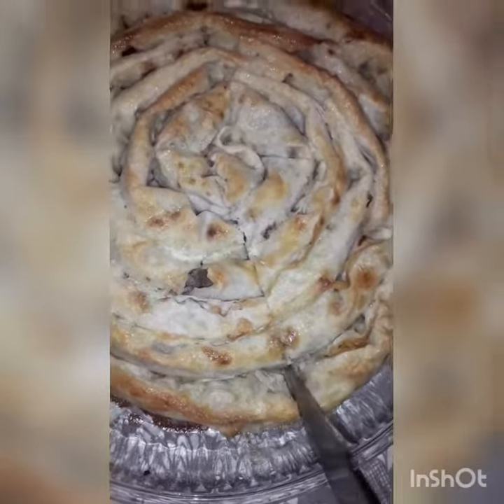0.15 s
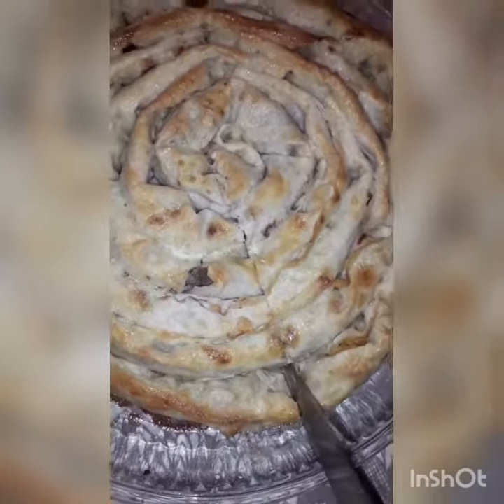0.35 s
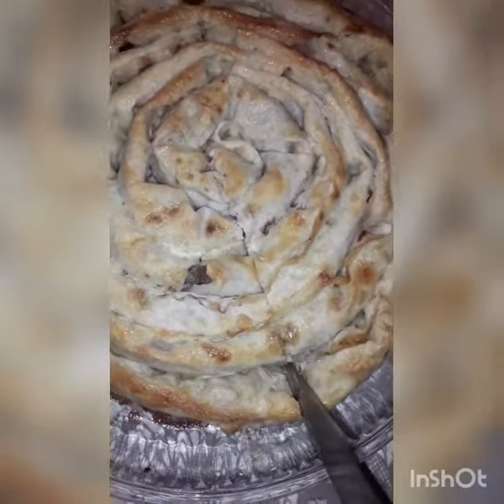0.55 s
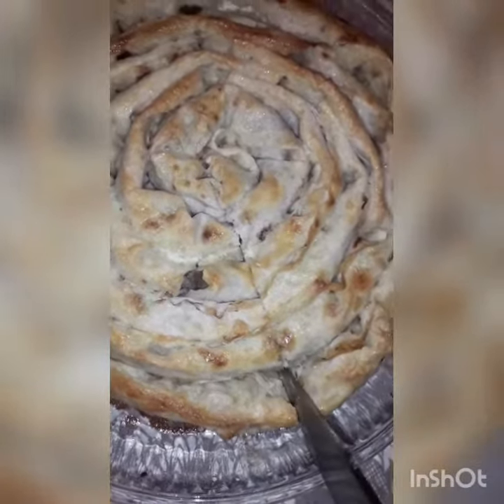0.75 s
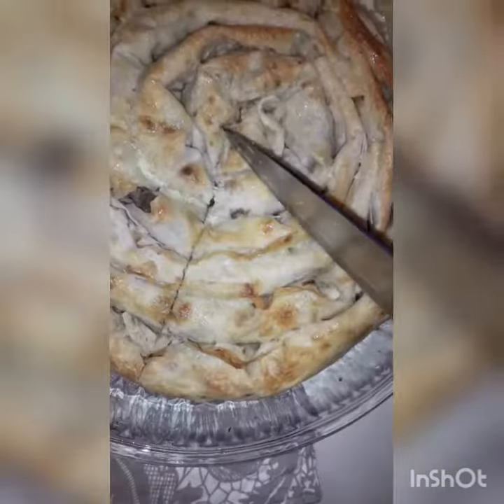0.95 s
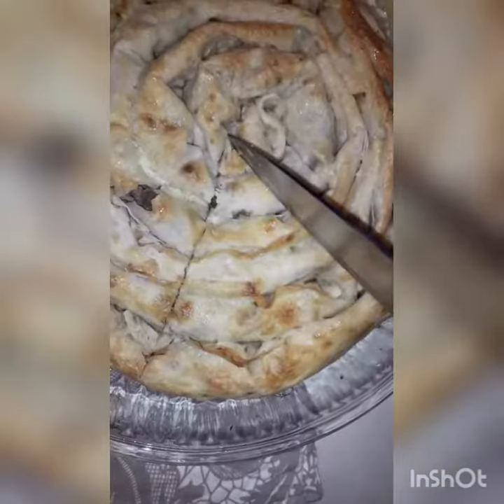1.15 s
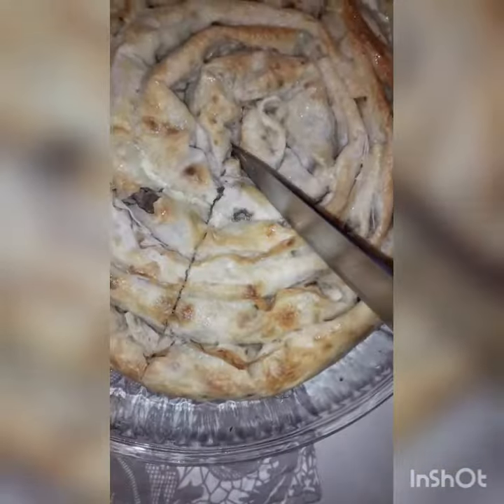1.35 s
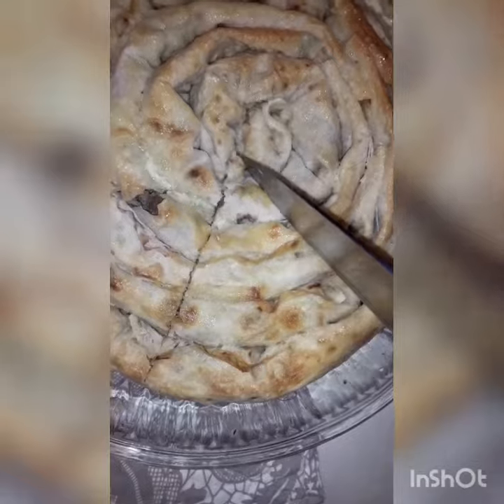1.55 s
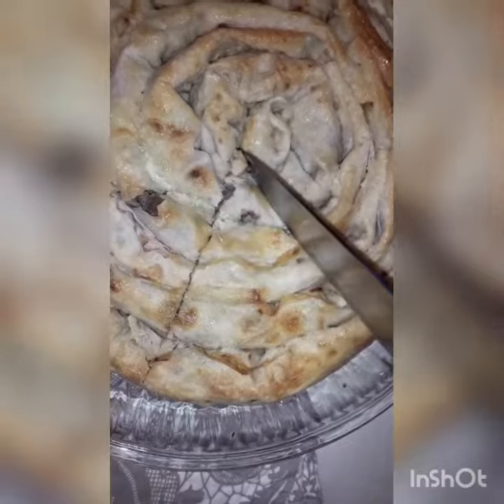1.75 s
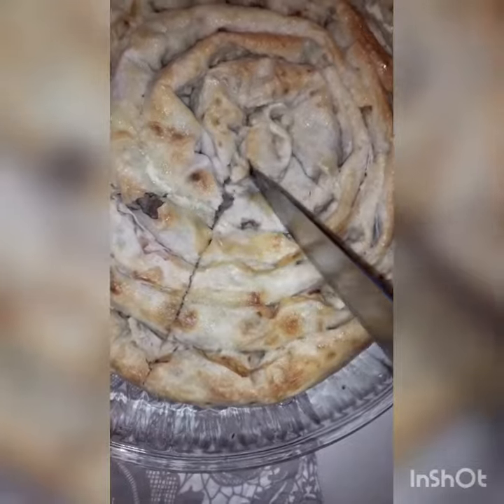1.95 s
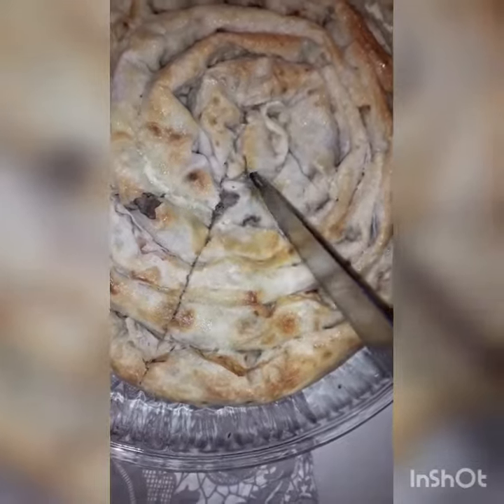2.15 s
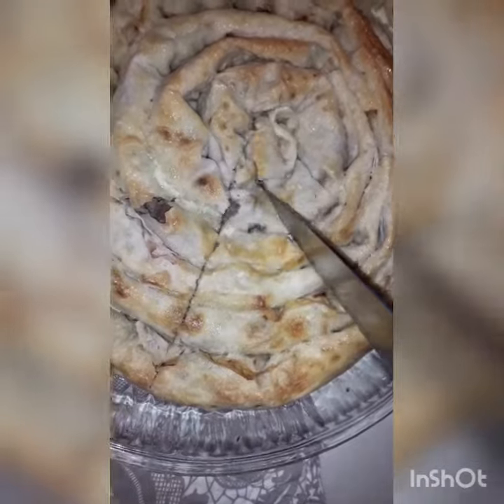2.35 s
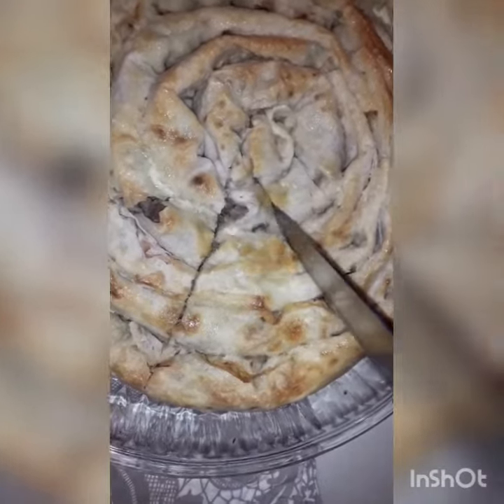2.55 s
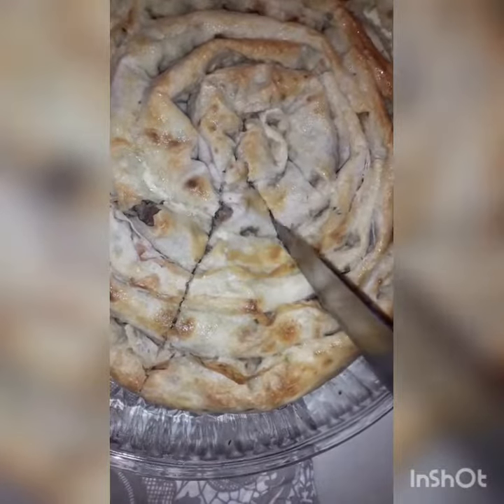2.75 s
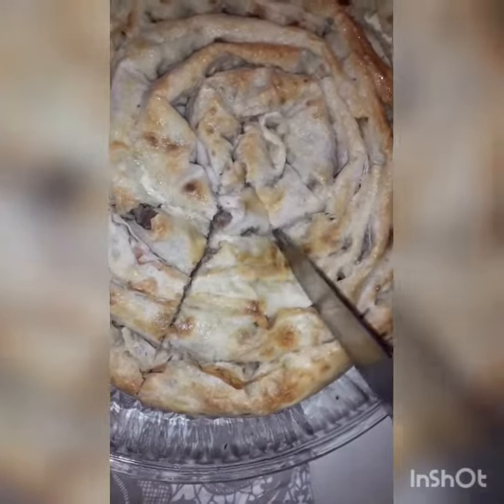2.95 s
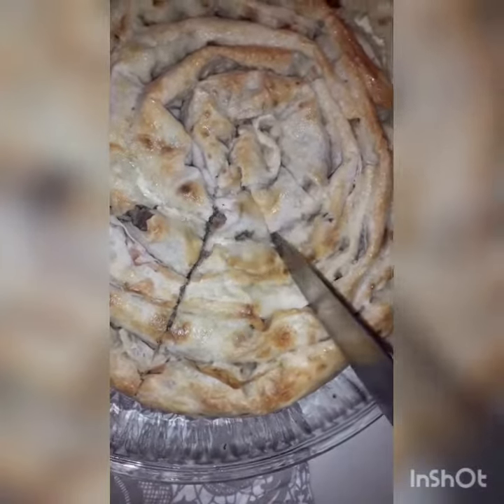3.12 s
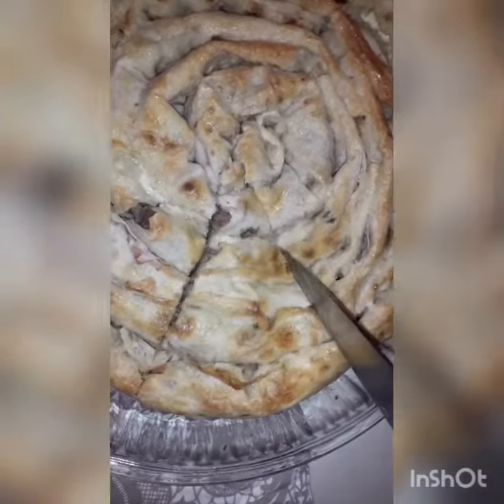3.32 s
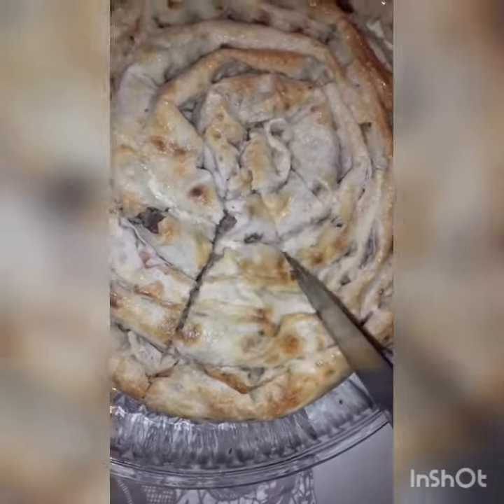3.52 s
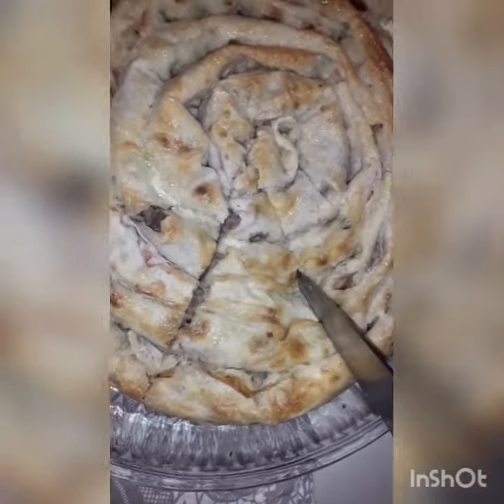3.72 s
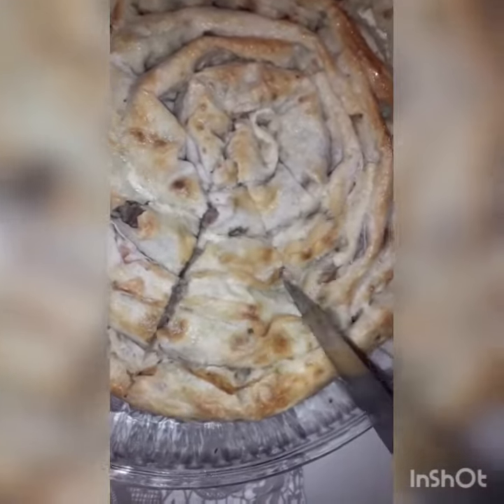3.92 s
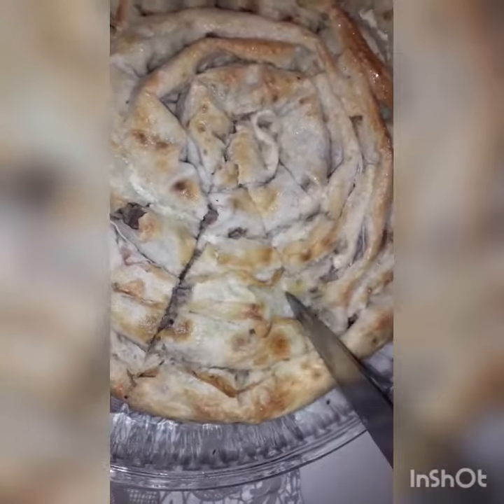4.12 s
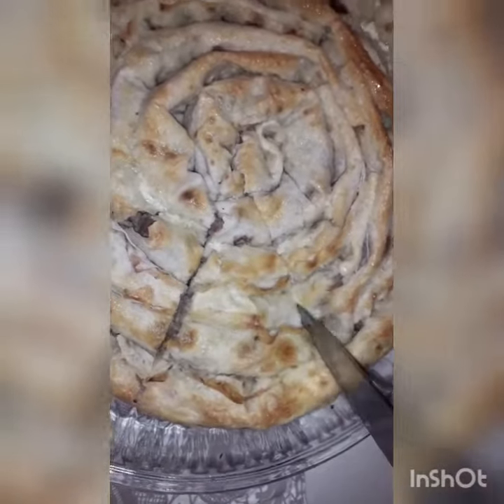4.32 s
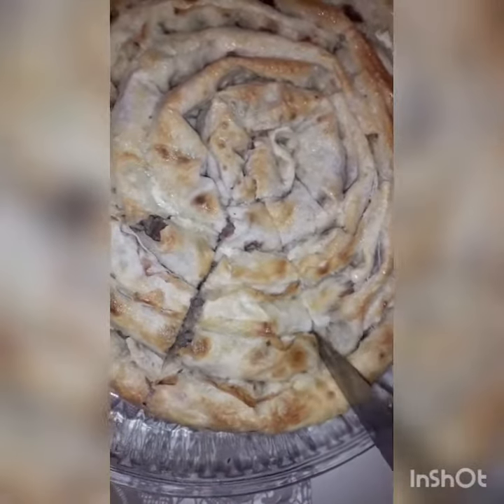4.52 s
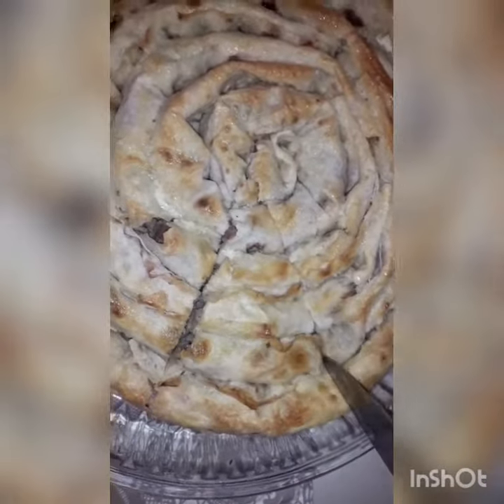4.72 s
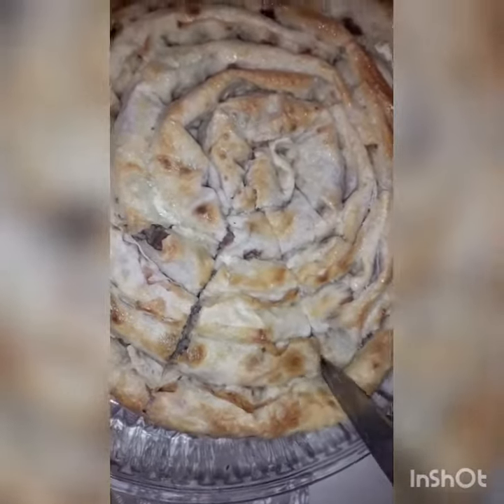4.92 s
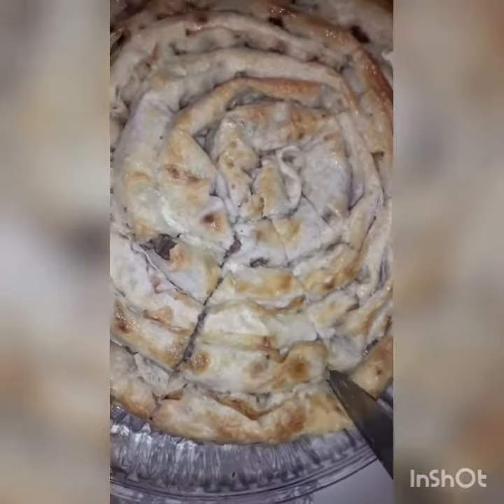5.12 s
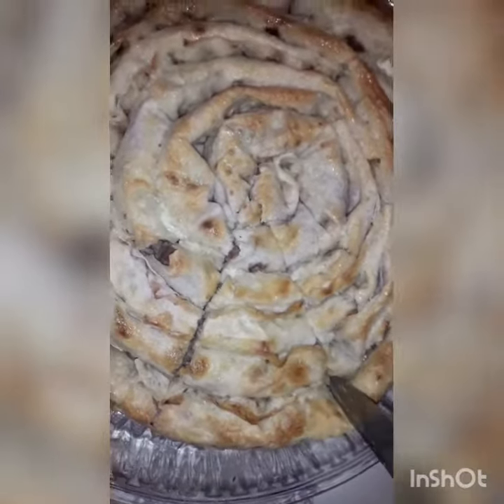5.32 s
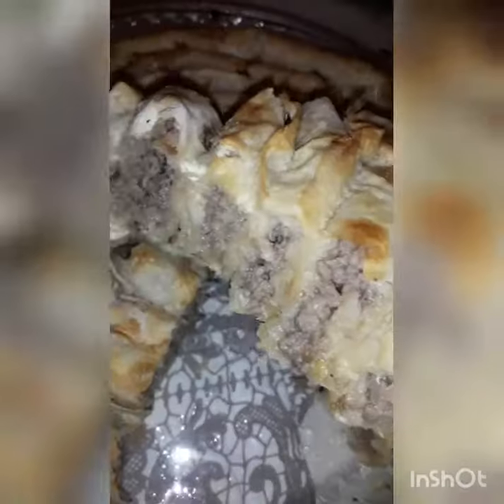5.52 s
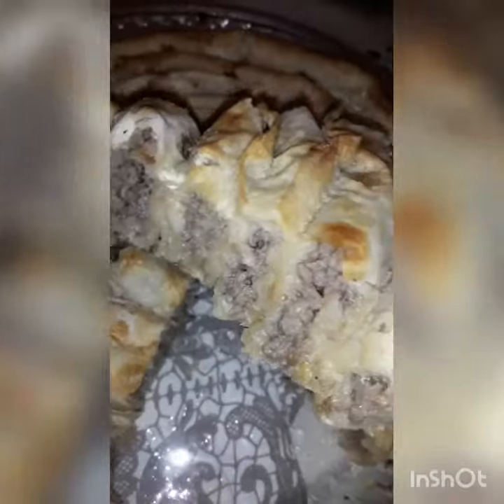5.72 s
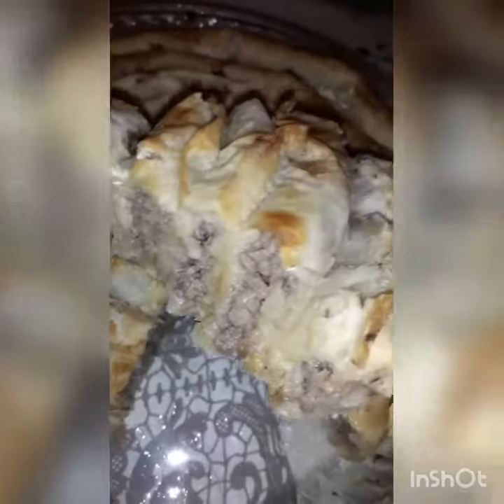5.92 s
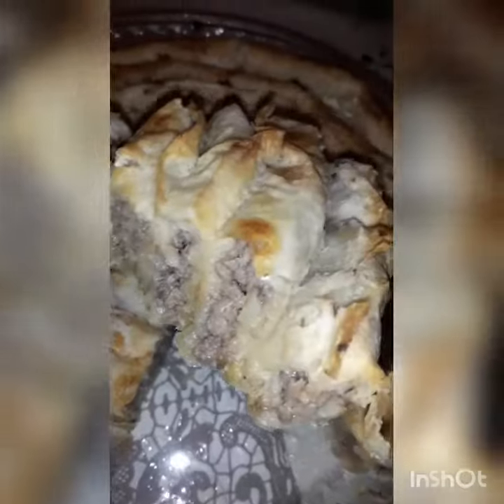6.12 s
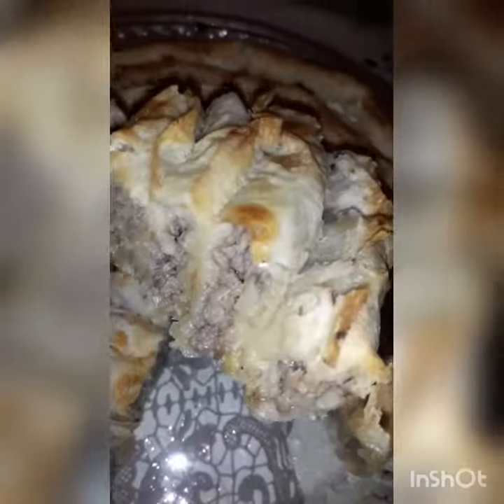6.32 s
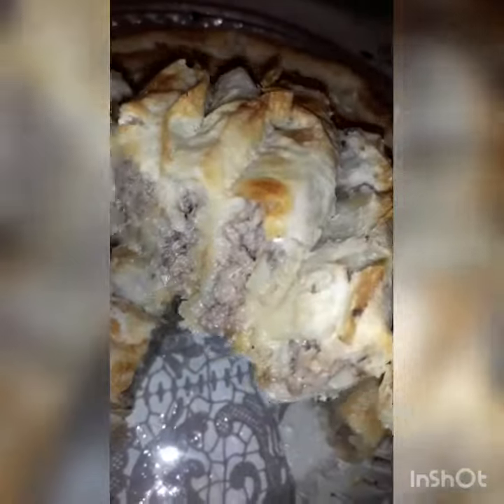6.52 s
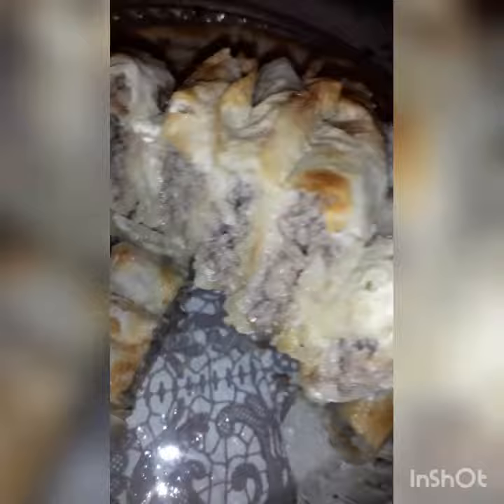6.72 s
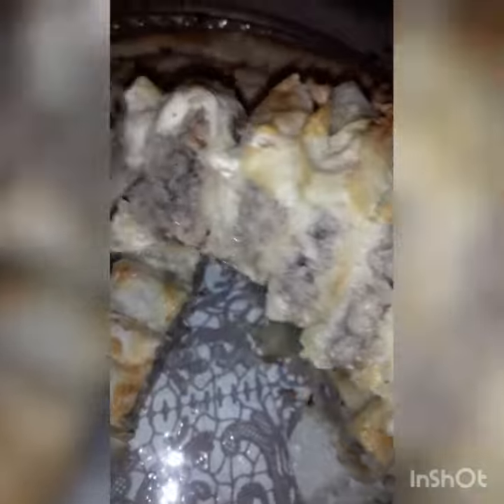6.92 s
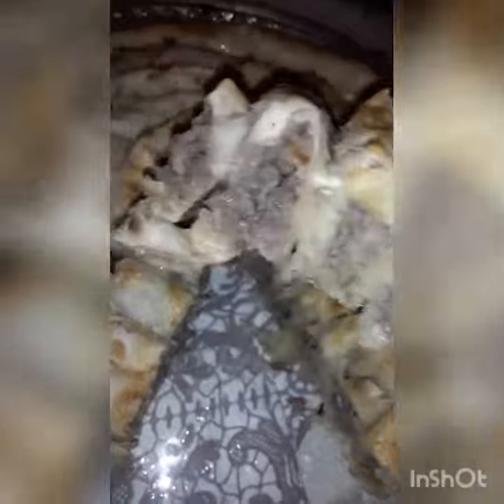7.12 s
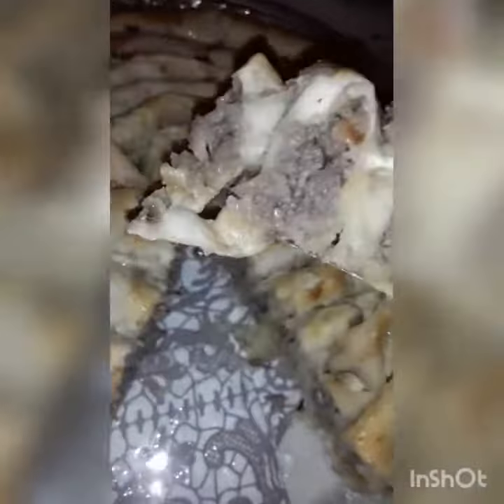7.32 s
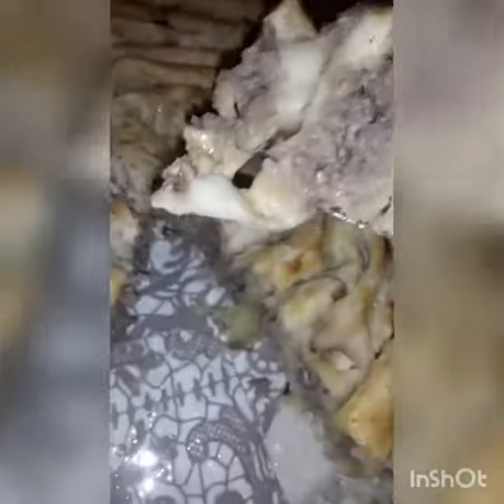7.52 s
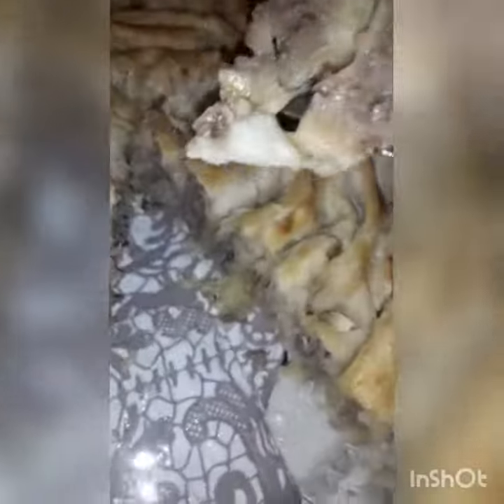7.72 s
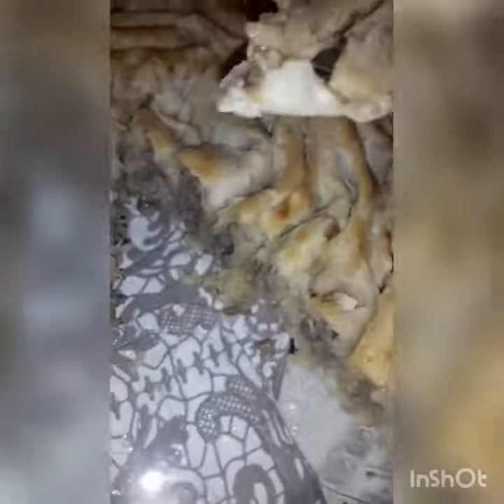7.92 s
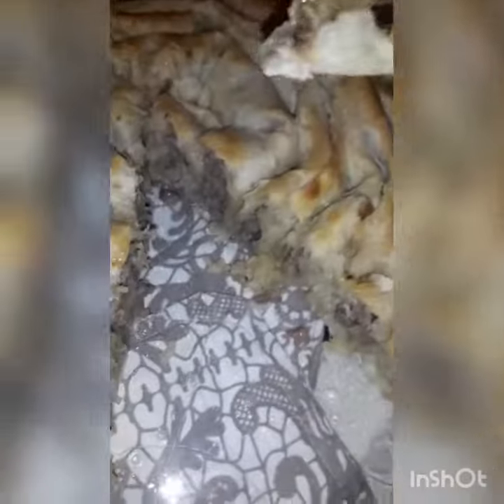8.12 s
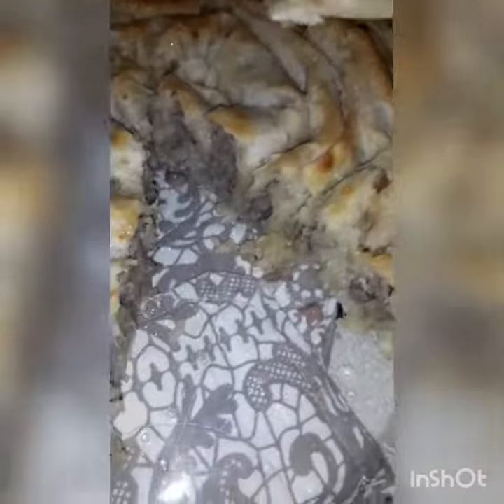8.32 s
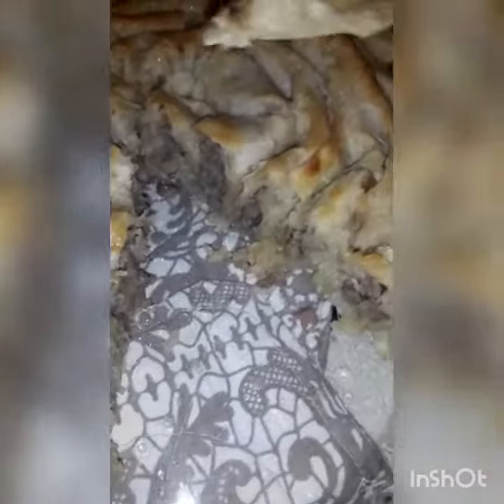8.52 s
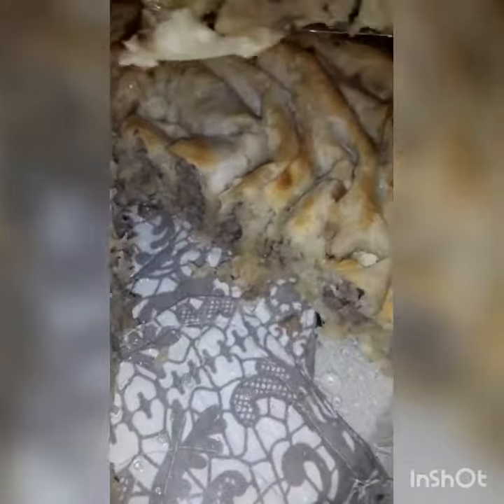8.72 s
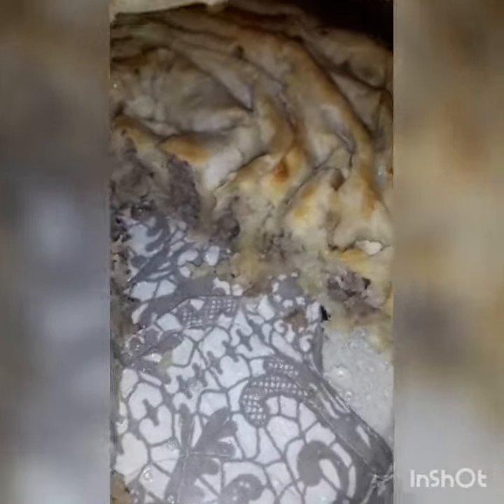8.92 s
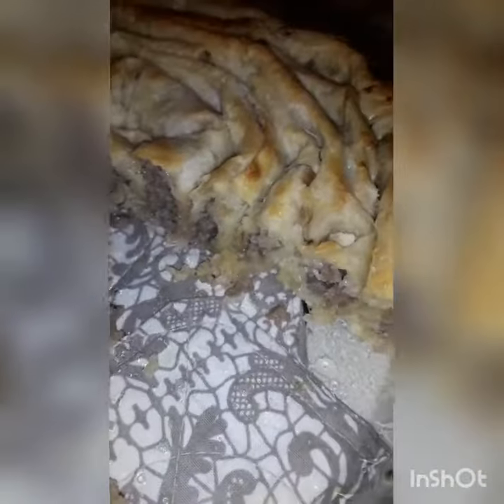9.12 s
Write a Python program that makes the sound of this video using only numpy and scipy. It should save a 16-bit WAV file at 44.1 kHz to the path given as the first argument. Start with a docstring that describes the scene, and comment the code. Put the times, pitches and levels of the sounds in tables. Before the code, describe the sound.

Crisp pastry crunches and snaps under a sawing knife, then a quiet kitchen hums on with dull thuds and a brief rub.

```python
"""A quiet kitchen: hiss, appliance tones and a knife sawing crisp pastry on a tray, close by.
Each stroke crushes flakes and snaps crust; the blade knocks the dish and taps the tray's rim.
At 5.4 s the sawing ends and the sound drops out for 30 ms. The kitchen hums on,
with dull thuds on the table, a few handling clicks and a short rub over cloth near the end."""
import sys
import numpy as np
from scipy import signal
from scipy.fft import rfft, irfft, next_fast_len
from scipy.io import wavfile
from scipy.ndimage import uniform_filter1d

SR = 44100
rng = np.random.default_rng(int(sys.argv[2]) if len(sys.argv) > 2 else 0)


def dump_mix(stems):
    """Bounce the given channels to the path in sys.argv[1] as a 16-bit WAV at rate SR."""
    frames = np.atleast_2d(stems).T  # one column per channel
    limited = np.clip(frames, -1, 1)  # hard clip at full scale
    pcm = np.round(limited * 32767).astype(np.int16)
    wavfile.write(sys.argv[1], SR, pcm)


N = 403937

HISS_SPECTRUM = [(150, -29), (250, -6), (601, -8.5), (853, -2), (1320, -10.5), (1780, -6), (2360, -7),
                 (2570, -10.5), (3470, -5), (4060, -7.5), (4510, -11), (6870, -10.5), (8630, -34.5),
                 (15100, -17), (16500, -22)]  # room hiss: f/Hz, level/dB
HISS_LEVEL = [(0, -66), (5.45, -66.5), (5.47, -59.5), (9.2, -58)]  # room hiss: t/s, level/dB
WHINE_TONES = [(877, 30, -77), (2290, 14, -76), (3435, 14, -70), (4580, 14, -79)]  # thin appliance tones: f/Hz, width/Hz, level/dB
WHINE_GAIN = [(0, -3), (5.45, -3), (7.45, 0), (7.55, 5), (8.2, 4), (8.3, -2), (9.2, -2)]  # their swell: t/s, gain/dB
HUM_TONES = [(54, 9, -65), (91, 9, -67), (119, 10, -70)]  # low appliance tones: f/Hz, width/Hz, level/dB
HUM_GAIN = [(0, -6.5), (5.3, -9.5), (5.6, 1.5), (6.5, 3), (7, -1.5), (8.5, -2), (8.9, 3), (9.2, 4.5)]  # their swell: t/s, gain/dB
STIR_SPECTRUM = [(40, -45.5), (70, -11), (100, 0.5), (145, -0.5), (250, -2.5), (300, -8.5), (400, -46.5)]  # low stir of hand and room: f/Hz, level/dB
STIR_LEVEL = [(0, -72), (5.43, -73), (5.5, -69), (6.5, -68.5), (6.65, -60), (6.8, -68), (7.45, -65),
              (8.1, -70), (8.27, -48), (8.4, -53), (8.46, -43), (8.58, -63.5), (8.7, -53.5), (8.9, -67),
              (9.2, -68.5)]  # same stir: t/s, level/dB

# crunch from saw strokes, plus noisy tails after rim taps: t/s at peak, hold/s, level/dB,
# attack/(dB/s), release/(dB/s), low/dB re mid, top/dB re mid
CRUNCH_SWELLS = [(.035, .03, -53.5, 300, 301.5, -11.5, -11), (.10, 0.0145, -46.5, 500, 124, -0.5, -17),
                 (.262, 0.017, -48.5, 398.5, 72, -9, -18.5), (.595, 0.0063, -65, 195.5, 150, -12, -12.5),
                 (.916, 0.01, -49.5, 68, 100, -8.5, -10), (1.016, 0.18, -52.5, 198, 60, -10.5, -16.5),
                 (1.27, .11, -37, 252, 289, -9.5, -12.5), (1.503, 0.035, -32, 500, 199, -14.5, -14),
                 (1.659, .06, -29.5, 320, 240, -4, -12), (1.887, 0.092, -29, 650, 900, -13, -12.5),
                 (2.043, 0.079, -31, 999.5, 150, -2.5, -9), (2.371, 0.0052, -41, 92, 226, -10.5, -9.5),
                 (2.535, 0.01, -29, 503, 400.5, -17.5, -5), (2.763, 0.0033, -30, 594, 356.5, -18, -12.5),
                 (2.961, 0.0033, -35.5, 200, 269, -9.5, -14.5),
                 (3.136, 0.064, -40.5, 418.5, 370, -12.5, -13.5), (3.363, 0.041, -35, 275, 650, -6, -10.5),
                 (3.53, 0.063, -45, 170, 440, -15, -12.5), (3.681, .06, -41.5, 420, 229, -6, -8.5),
                 (3.939, 0.012, -37, 244, 220, -12, -11.5), (4.167, 0.0069, -36, 174, 190.5, -3, -19.5),
                 (4.32, 0.0042, -41, 226, 279, -5.5, -12), (4.452, 0.075, -47.5, 400, 250, -6, -9),
                 (4.651, .01, -53, 174.5, 160, -7, -12.5), (4.82, .01, -45.5, 179, 192, -3.5, -19),
                 (4.963, .02, -54.5, 295, 130, -2, -11), (5.089, .01, -44.5, 204, 143, 2.5, -20)]
CRUST_AT_REST = (-63, -18, -10)  # settling between strokes: level/dB, low/dB re mid, top/dB re mid
CRUST_SPECTRUM = [(59, -55), (100, -24.5), (291, -3), (456, 1), (684, -9), (794, 0.5), (1090, -12.5),
                  (1680, -6), (6180, -5.5), (8880, -24.5), (11500, -13.5), (15100, -14), (16500, -25.5)]  # breaking flakes: f/Hz, level/dB
# crust snaps while sawing, then handling clicks at thud and rub:
# t/s, level/dB, low/dB re mid, top/dB re mid, fall/(ms per 10 dB, sign ignored)
SHARP_CLICKS = [(0.0688, -32, -21, -6.5, 1.63), (.081, -21.5, -18, -5, 1.5),
                (0.0995, -14.5, -1.5, -20, 3.5), (.142, -7, -10.5, -20, 2.5),
                (0.2654, -23, 1.5, -22.5, 2.5), (0.3144, -12.5, -8.5, -22, 2),
                (0.5726, -40.5, -0.5, -18.5, 1.3), (.587, -47, 2, -20.5, 3.5),
                (0.7519, -42.5, -28, -17.5, 3.5), (0.862, -29, -9.5, -8, 2.8),
                (0.9093, -17.5, -8.5, -8.5, 1.03), (.9564, -36, -28.5, -11.5, 0.56),
                (1.0191, -37, -29, -3, 2.5), (1.08, -39, -37, -3, 0.6), (1.2155, -36, -32, -10, 2.7),
                (1.2296, -21.5, -36, -12.5, .5), (1.2582, -31, -22, -10.5, 8.5),
                (1.2782, -21.5, -8.5, -19.5, 2.5), (1.4576, -32, -36, -19.5, 0.75),
                (1.6436, -19.5, -8.5, -9, 0.7), (1.6537, -19, 2.5, -13, 1), (1.6636, -21.5, -3.5, -10, 3.5),
                (1.6823, -23.5, -8.5, -19, -0.4), (1.6937, -29.5, -22.5, -11.5, 5.5),
                (1.706, -30.5, -18.5, 10, 1.8), (1.746, -31.5, 8, -15.5, 0.6), (1.882, -29, -17.5, 0, 5),
                (1.893, -29, -3.5, -13.5, 2), (1.977, -21.5, -8.5, -4, 2.7),
                (1.9915, -17.5, -17, -10.5, 1.37), (2.0266, -29, -6, -4, 1.5),
                (2.0341, -11.5, -7.5, -1.5, 1.46), (2.0372, -13.5, 0.5, -6.5, 1.5),
                (2.0474, -12.5, -3.5, -9.5, 0.6), (2.0527, -6, -14.5, -8.5, 0.5),
                (2.0717, -26.5, -27, 4, 4.5), (2.0795, -19.5, -16.5, 2.5, 5), (2.095, -15, -24, 4.5, 1.5),
                (2.1043, -2.5, -8, -30, 0.5), (2.1168, -17, .5, 1, -0.5), (2.1197, -18, -20, -2.5, 3.5),
                (2.127, -23, -11.5, -0.5, 1.5), (2.2683, -28.5, -25, -2.5, 1.2),
                (2.4975, -26, -11, -28.5, 0.6), (2.5181, -40, -7, 7, 2.5), (2.5723, -28.5, -18, -16.5, 5.5),
                (2.5858, -26, -21, -9, 1.8), (2.6063, -32.5, -19, -18, 2.5), (2.653, -43, -13, -15, 1.5),
                (2.6182, -27, -23, -11, 0.9), (2.7423, -27.5, -17, -7, 7), (2.7599, -27.5, -15.5, -10, 1.5),
                (2.776, -27.5, -31, -17.5, 4), (2.9107, -37, -16, -5, 4.5), (2.923, -23, -16, -34.5, 1.5),
                (2.9667, -10, -5.5, -20, 2.5), (3.304, -45.5, 3, -10, 3), (3.3321, -26.5, 0, -31, 1),
                (3.341, -24, -23, -4, 4.5), (3.359, -28.5, -32, 3, 4.5), (3.3724, -21.5, -24, -11.5, 2),
                (3.414, -30.5, -36.5, -12, 3.6), (3.4541, -27, -26, -1, .9), (3.4895, -35, -25, -8, 1.7),
                (3.675, -43.5, -17.5, -1.5, 5), (3.733, -27.5, -11.5, -6.5, 2.4),
                (3.742, -5.5, -4.5, -30, 1.77), (3.753, -29, 1, -2.5, 0.7), (3.8902, -37.5, -4.5, -7.5, 5),
                (3.9347, -30, -9, -29, 5.5), (4.06, -36, -26.5, 6.5, 1.4), (4.1635, -12.5, 0, -18.5, 3),
                (4.385, -43.5, -25, -15.5, 2.2), (4.453, -39, -28, 1, 2), (4.475, -40.5, -20, -12, 4),
                (4.5073, -34, -27, -29, 1.9), (4.5242, -30.5, -7, -42, 1), (4.642, -41, -20, 4, 1.7),
                (4.743, -41, -34, -27, 1), (4.792, -25, -26, -9, 1.5), (4.822, -31.5, 5, -27, 6.5),
                (5.045, -30, 6.5, -25, 8.5), (5.077, -29, 3.5, -22, 10), (5.0954, -12, -3.5, -13, 3.5),
                (5.3794, -43.5, 1.5, -18.5, 3.5), (7.5358, -43.5, 6, -33, 5), (8.3943, -36.5, -7, -34, 2),
                (8.4359, -24, -8, -20, 3), (8.566, -31.5, -29, -36, 2), (8.573, -34.5, 2, -1, 0.7)]
SMALL_SNAP_SHAPE = (-27.5, -7.5, 1.4)  # low/dB re mid, top/dB re mid, fall/(ms per 10 dB)
CLICK_SPECTRUM = [(120, -39.5), (250, -15.5), (500, -6), (900, -7.5), (1250, -5), (1600, -1), (2050, -9.5),
                  (2600, -2), (3200, -3.5), (4100, 2.5), (4700, -5), (6100, -3.5), (6800, -3.5),
                  (8300, -28), (11000, -53)]  # snaps and handling clicks: f/Hz, level/dB
RIM_TAPS = [(0.0992, -26.5, 0.5), (0.1406, -36, -4), (0.266, -35, -0.5), (0.3127, -40.5, -5.5),
            (4.8244, -42.5, -1), (5.044, -41, 5), (5.0783, -43.5, -2), (5.0942, -38.5, -3)]  # blade on rim: t/s, level/dB, tilt/(dB/octave)
RIM_MODES = [(585, -10, .2), (940, -14, .25), (1415, -5, .2), (1490, -3, .2), (2285, -11, .25),
             (2350, -7, .22), (3245, -7, .25), (3278, -1, .22), (4360, -5, .2), (5605, -6, .18),
             (6985, -18, .1)]  # tray rim: f/Hz, level/dB, t60/s
DISH_KNOCKS = [(1.665, -56, 0.5), (2.033, -56, 1), (2.104, -23.5, -2), (2.967, -25.5, 2), (3.742, -30.5, 0),
               (4.165, -18.5, 3.5), (5.096, -39, 0)]  # blade on dish: t/s, level/dB, tilt/(dB/octave)
DISH_MODES = [(435.5, -11, 0.23), (701, -14, 0.55), (840, -6.5, 0.25), (880, -5, .2), (1009, -3, 0.32),
              (1076, -4, 0.2), (1262, -7.5, 0.3), (1355, -14.5, 0.11), (1568, -6, 0.18), (1614, -6.5, 0.24),
              (1673, -12.5, .22), (1784, -10.5, .2), (3030, -4.5, 0.034), (4150, 1.5, 0.026),
              (6300, 2.5, .025)]  # dish: f/Hz, level/dB, t60/s
TABLE_THUDS = [(5.375, -45.5, 0.17), (7.503, -33, 0.42), (8.439, -39, 0.2)]  # dull knocks: t/s, level/dB, t60/s
TABLE_SPECTRUM = [(40, -49.5), (80, -7), (123, -2.5), (220, -4), (320, -8), (367, -0.5), (470, -8),
                  (900, -15.5), (2500, -34), (3500, -56)]  # knocked table: f/Hz, level/dB
RUB_LEVEL = [(8.33, -73), (8.43, -46), (8.514, -49), (8.651, -42), (8.713, -43.5), (8.75, -53),
             (8.95, -62.5)]  # slide over cloth: t/s, level/dB
CLOTH_SPECTRUM = [(180, -59.5), (300, -12), (694, -9), (1330, -15.5), (1930, -11), (3970, -8.5),
                  (6560, -11.5), (8870, -29), (15200, -24), (16500, -32.5)]  # cloth friction: f/Hz, level/dB

ROOM_DECAY = [(200, 0.39), (1000, 0.33), (4000, 0.2), (12000, 0.24)]  # reverberation: f/Hz, t60/s
SIDE_SPECTRUM = [(1500, -30), (3000, -22), (5500, -11), (9000, -5.5), (14000, -6.5)]  # left-right difference filter: f/Hz, gain per pass/dB
DROPOUT_S = (5.433, 5.464)  # brief silence: start/s, end/s

SAW_END_S = DROPOUT_S[0]
LOW_SPLIT_HZ, TOP_SPLIT_HZ, LIMIT_HZ = 2000, 8800, 16000


def amp(db):
    """Gain from dB."""
    return 10 ** (np.asarray(db) / 20)


def unit(x):
    """x at rms 1."""
    return x / np.sqrt(np.mean(x ** 2) + 1e-20)


def along(points, hz):
    """(f/Hz, value) points, interpolated over log frequency."""
    point_hz, values = np.transpose(points)
    return np.interp(np.log(hz + 1), np.log(point_hz + 1), values)


def envelope(points):
    """Gain per sample from (t/s, level/dB) points; silent outside them."""
    times_s, db = np.transpose(points)
    return amp(np.interp(np.arange(N) / SR, times_s, db, -120, -120))


def coloured(x, spectrum):
    """Minimum-phase filter following (f/Hz, level/dB) points."""
    n = x.shape[-1]
    size = 2 * next_fast_len(n // 2 + 4096)
    gain = amp(along(spectrum, np.fft.rfftfreq(size, 1 / SR)))
    cepstrum = irfft(np.log(gain + 1e-5), size)
    cepstrum[1:size // 2] *= 2
    cepstrum[size // 2 + 1:] = 0
    return irfft(rfft(x, size) * np.exp(rfft(cepstrum)), size)[..., :n]


def in_bands(drives, spectra):
    """Sum of coloured mid, low and top bands, each at unit noise gain."""
    bands = [([LOW_SPLIT_HZ, TOP_SPLIT_HZ], "band"), (LOW_SPLIT_HZ, "low"), (TOP_SPLIT_HZ, "high")]
    out = np.zeros(N)
    for drive, spectrum, (hz, kind) in zip(drives, spectra, bands):
        band = signal.butter(3, hz, kind, fs=SR, output="sos")
        response = signal.sosfilt(band, coloured(np.arange(4096) == 0, spectrum))
        out += signal.fftconvolve(drive, response / np.linalg.norm(response))[:N]
    return out


def patchy(depth_db, frames):
    """White noise, its gain drifting in time-frequency patches; 6 ms per frame."""
    bins = signal.stft(rng.standard_normal(N), nperseg=512)[2]
    drift = uniform_filter1d(rng.standard_normal(bins.shape), size=9, axis=0)
    drift = uniform_filter1d(drift, size=frames, axis=1)
    return signal.istft(bins * amp(depth_db * unit(drift)), nperseg=512)[1][:N]


def tones(table):
    """Noise through narrow resonances."""
    out = np.zeros(N)
    for hz, width_hz, db in table:
        resonance = signal.iirpeak(hz, hz / width_hz, SR)
        out += amp(db) * unit(signal.lfilter(*resonance, rng.standard_normal(N)))
    return out


def kitchen():
    """Uneven hiss, a far appliance and a low stir fed by the knife's push on the table."""
    hiss = envelope(HISS_LEVEL) * unit(coloured(patchy(depth_db=1.2, frames=30), HISS_SPECTRUM))
    stir_gain = envelope(STIR_LEVEL) + amp(-11.5) * crunch_gains()[1]
    stir = stir_gain * unit(coloured(rng.standard_normal(N), STIR_SPECTRUM))
    whine = envelope(WHINE_GAIN) * tones(WHINE_TONES)
    hum = envelope(HUM_GAIN) * tones(HUM_TONES)
    return hiss + whine + hum + stir


def crunch_gains(sag_db_per_s=44.5):
    """Mid, low and top gains: each swell builds, sags while held, dies away."""
    t = np.arange(round(SAW_END_S * SR)) / SR
    rest_db, low_db, top_db = CRUST_AT_REST
    gains = np.zeros((3, N))
    gains[:, :len(t)] = amp(rest_db + np.vstack([0, low_db, top_db]))
    for at_s, hold_s, db, attack_db_per_s, release_db_per_s, low_db, top_db in CRUNCH_SWELLS:
        centre = round(at_s * SR)
        span = slice(max(centre - SR // 3, 0), centre + SR // 3)
        age_s = t[span] - at_s
        rise_db = attack_db_per_s * np.minimum(age_s, 0)
        sag_db = sag_db_per_s * np.clip(age_s, 0, hold_s)
        fall_db = release_db_per_s * np.vstack([1, .8, 1.2]) * np.maximum(age_s - hold_s, 0)
        peak_db = db + np.vstack([0, low_db, top_db])
        gains[:, span] = np.maximum(gains[:, span], amp(peak_db + rise_db - sag_db - fall_db))
    return gains


def grains(rate_per_s, spread_db, life_s):
    """Envelope of random, fast-dying pulses, a few far larger than the rest."""
    starts = rng.random(N) < rate_per_s / SR
    sizes = amp(spread_db * np.minimum(rng.exponential(size=N), 3))
    return unit(signal.lfilter([1], [1, -np.exp(-1 / (life_s * SR))], starts * sizes))


def crunch():
    """Dense, grainy rasp: flakes breaking under the blade, and noisy tails after rim taps."""
    shared = grains(rate_per_s=600, spread_db=7.5, life_s=0.0005)
    per_band = [grains(rate_per_s=550, spread_db=7.5, life_s=0.001) for _ in range(3)]
    noise = patchy(depth_db=2.5, frames=5)  # each crust layer has its own colour
    drives = [gain * unit((0.79 + 0.5 * shared + 0.79 * own) * noise)
              for gain, own in zip(crunch_gains(), per_band)]
    return in_bands(drives, [CRUST_SPECTRUM] * 3)


def small_snaps(rate_per_s=50, rest_db=-46, spread_db=12):
    """Random snaps that grow with the crunch; columns as SHARP_CLICKS."""
    wait_draw, size_draw = rng.random((400, 2)).T
    times_s = np.cumsum(-np.log(1 - wait_draw)) / rate_per_s
    samples = np.minimum(times_s * SR, N - 1).astype(int)
    crunch_db = 20 * np.log10(crunch_gains()[0, samples] + 1e-9)
    levels_db = rest_db + .6 * (crunch_db - CRUST_AT_REST[0]) - spread_db * size_draw
    return [(at_s, db, *SMALL_SNAP_SHAPE) for at_s, db in zip(times_s, levels_db) if at_s < SAW_END_S]


def clicks(rise_over_fall=.3):
    """Crust snaps while sawing, then handling clicks: short noise bursts, longest in the low band."""
    half = SR // 40
    t_ms = np.arange(-half, half) / SR * 1000
    drives = np.zeros((3, N + 2 * half))
    for at_s, db, low_db, top_db, fall_ms in SHARP_CLICKS + small_snaps():
        peak_db = db + np.vstack([0, low_db, top_db])
        rise_db = 10 * t_ms / abs(rise_over_fall * fall_ms)
        fall_db = -10 * t_ms / (abs(fall_ms) * np.vstack([1, 1.5, .8]))
        gain = amp(peak_db + np.where(t_ms < 0, rise_db, fall_db))
        drives[:, round(at_s * SR):][:, :2 * half] += gain * rng.standard_normal(2 * half)
    return in_bands(drives[:, half:N + half], [CLICK_SPECTRUM, CLICK_SPECTRUM, CRUST_SPECTRUM])


def struck(blows, modes, slap_db, blur_hz, partials):
    """Blows on a body: each mode a cluster of partials, strong at contact, then ringing freely."""
    t = np.arange(SR // 3) / SR
    contact = (1 - np.exp(-t / 0.00035)) * (1 + amp(slap_db) * np.exp(-t / 0.0023))
    out = np.zeros(N + SR)
    for at_s, blow_db, tilt_db_per_oct in blows:
        ring = 0
        for hz, mode_db, t60_s in modes:
            partial_hz = hz + rng.normal(0, blur_hz, (partials, 1))
            cluster = np.sin(2 * np.pi * (partial_hz * t + rng.random((partials, 1)))).sum(axis=0)
            start_db = mode_db - 10 * np.log10(partials) + tilt_db_per_oct * np.log2(hz / 3250)
            ring += amp(start_db - 60 * t / t60_s) * cluster
        out[round(at_s * SR):][:len(t)] += amp(blow_db) * ring * contact
    return out[:N]


def rim_taps():
    """The blade touches the rim: a few clear modes."""
    return struck(RIM_TAPS, RIM_MODES, slap_db=15, blur_hz=11, partials=2)


def dish_knocks():
    """The blade breaks through to the dish; the pastry blurs its modes."""
    return struck(DISH_KNOCKS, DISH_MODES, slap_db=11.5, blur_hz=35, partials=7)


def table_thuds():
    """Soft contacts: low noise dying away in table and room."""
    t = np.arange(SR // 2) / SR
    attack = 1 - np.exp(-t / 0.0022)
    gain = np.zeros(N + SR)
    for at_s, db, t60_s in TABLE_THUDS:
        gain[round(at_s * SR):][:len(t)] += amp(db - 60 * t / t60_s) * attack
    noise = rng.standard_normal(N)
    return coloured(gain[:N] * noise, TABLE_SPECTRUM) / np.std(coloured(noise, TABLE_SPECTRUM))


def cloth_rub():
    """Something slides over cloth: dense, fine friction grains."""
    grain = 2 + 0.43 * grains(rate_per_s=580, spread_db=5.5, life_s=0.00055)
    return envelope(RUB_LEVEL) * unit(coloured(grain * rng.standard_normal(N), CLOTH_SPECTRUM))


def reverb(x, delay_samples=130):
    """Room reflections: frequency-dependent decay, a new noise tail every 0.25 s."""
    out, step = np.zeros(N + SR), SR // 4
    for start in range(0, N, step):
        hz, t, bins = signal.stft(rng.standard_normal(SR // 2), SR, nperseg=256)
        decay = amp(-60 * t / along(ROOM_DECAY, hz)[:, None])
        tail = signal.istft(bins * decay, SR, nperseg=256)[1]
        wet = signal.fftconvolve(x[start:start + step], tail / np.linalg.norm(tail))
        out[start + delay_samples:][:len(wet)] += wet
    return out[:N]


def scene():
    """Mono mix on two channels; reverb on crunch, clicks, rim and dish."""
    near = crunch() + clicks() + rim_taps() + dish_knocks()
    mono = near + amp(-16.5) * reverb(near) + table_thuds() + cloth_rub() + kitchen()
    return np.array([mono, mono])


def record(dry):
    """Left-right treble flutter, brief dropout, soft clip, 45 Hz high-pass, band limit."""
    flutter = unit(uniform_filter1d(rng.standard_normal(N), size=150))
    side = coloured(flutter * coloured(dry[0], SIDE_SPECTRUM), SIDE_SPECTRUM)
    t = np.arange(N) / SR
    gate = np.clip(np.maximum(DROPOUT_S[0] - t, t - DROPOUT_S[1]) / 0.00208, 0, 1)
    gated = (dry + [side, -side]) * gate
    clipped = gated / (1 + np.abs(gated / .97) ** 6) ** (1 / 6)
    highpassed = signal.sosfilt(signal.butter(2, 45, "high", fs=SR, output="sos"), clipped)
    size = next_fast_len(N)
    passband = np.fft.rfftfreq(size, 1 / SR) < LIMIT_HZ
    return irfft(rfft(highpassed, size) * passband, size)[:, :N]


dry = scene()
out = record(dry)
dump_mix(out)
```